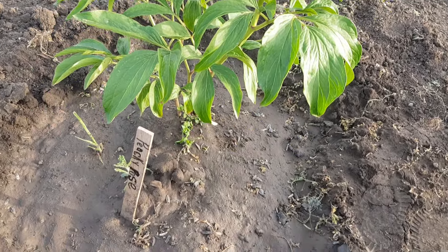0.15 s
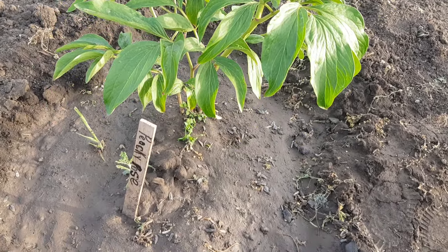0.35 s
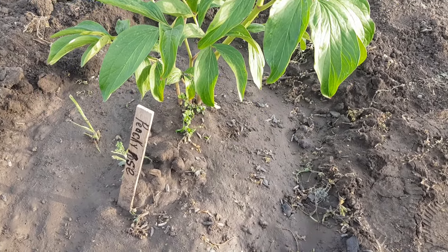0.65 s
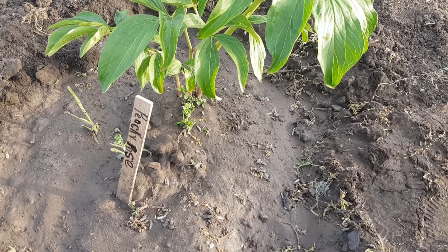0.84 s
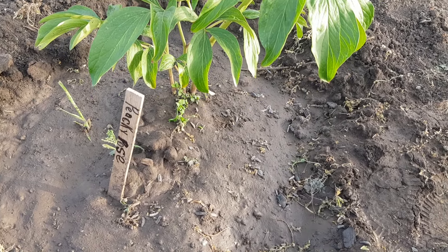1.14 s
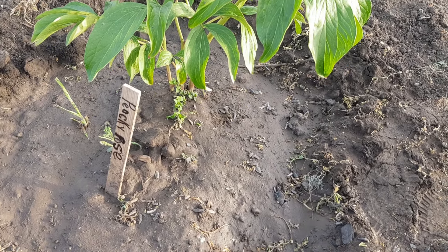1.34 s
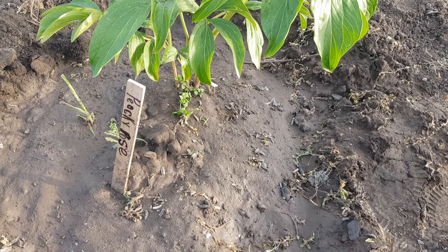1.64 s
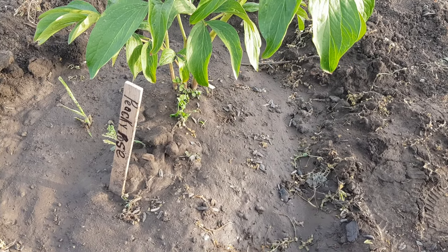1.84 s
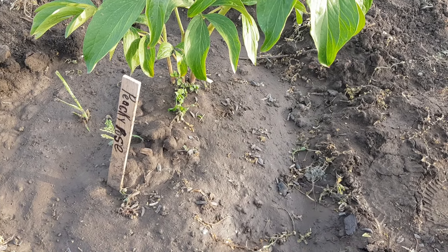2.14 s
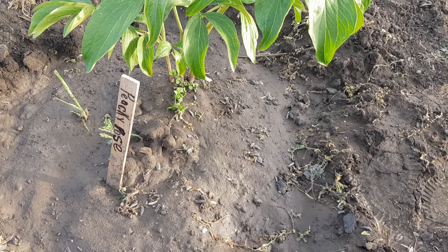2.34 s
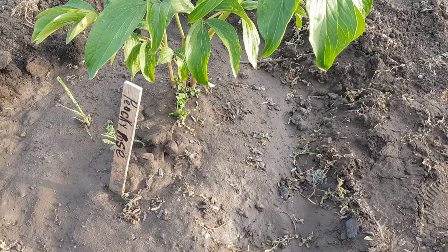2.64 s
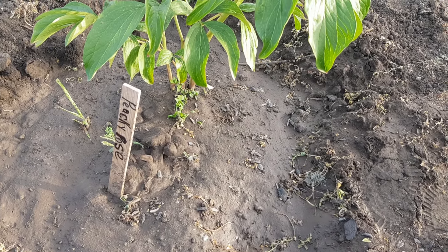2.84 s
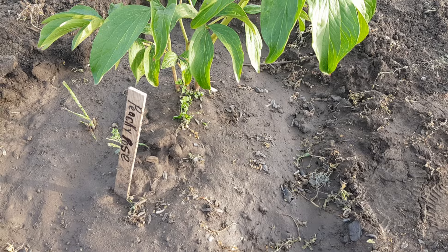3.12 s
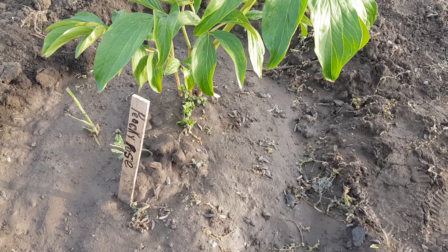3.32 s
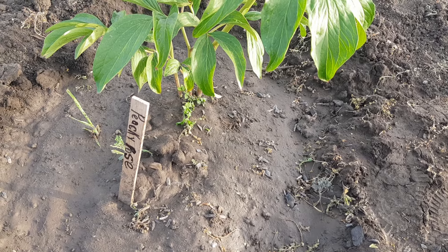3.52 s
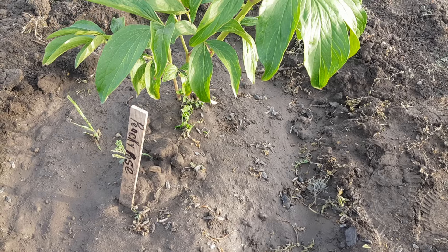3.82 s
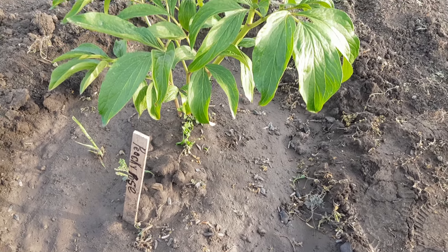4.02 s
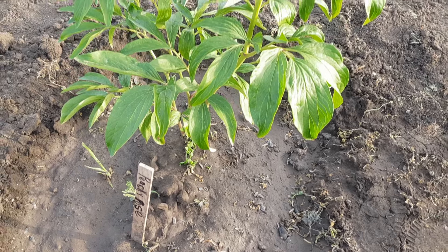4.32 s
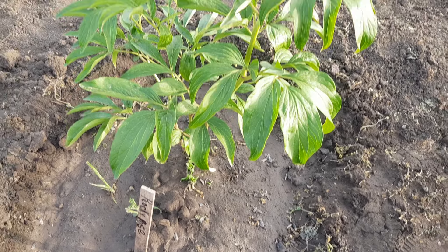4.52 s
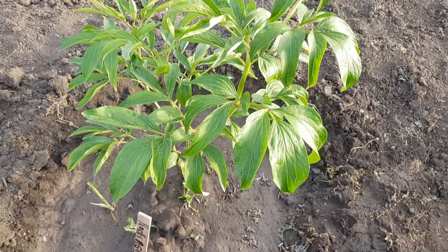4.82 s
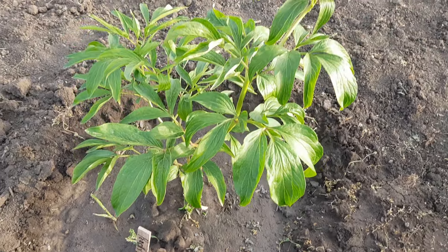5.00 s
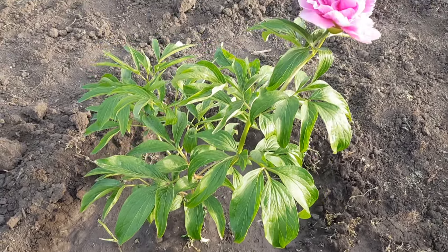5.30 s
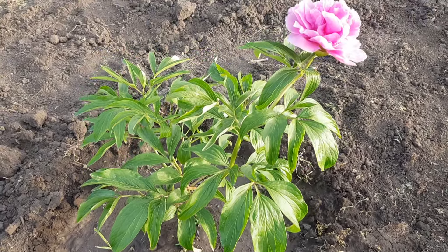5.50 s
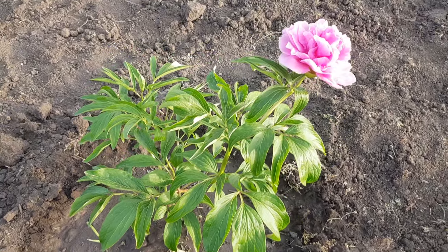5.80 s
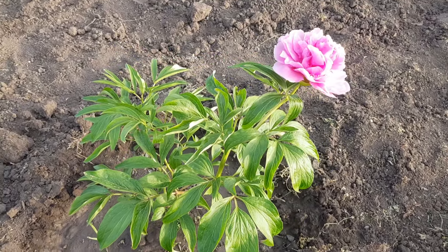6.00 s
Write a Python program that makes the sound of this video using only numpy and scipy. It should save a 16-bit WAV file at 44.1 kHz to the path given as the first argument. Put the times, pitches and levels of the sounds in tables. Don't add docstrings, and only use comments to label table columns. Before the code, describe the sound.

High, clear cricket chirps over a faint insect chorus and distant birds, with deep wind buffeting on the left and late handling thuds.

```python
import sys
import numpy as np
from scipy import signal
from scipy.io import wavfile
from scipy.ndimage import uniform_filter1d

SR = 44100
rng = np.random.default_rng(int(sys.argv[2]) if len(sys.argv) > 2 else 0)


def how_loud(loudness_db):
    steps = np.asarray(loudness_db, float) / 20
    return 10 ** steps


def generate_wav(sig):
    pcm = np.round(np.clip(np.atleast_2d(sig).T, -1, 1) * 32767).astype(np.int16)
    wavfile.write(sys.argv[1], SR, pcm)


N = 271308


def rms_one(x):
    return x / np.sqrt(np.mean(x ** 2, axis=-1, keepdims=True) + 1e-20)


def in_time(rows):
    s, *columns = np.transpose(rows)
    return [np.interp(np.arange(N) / SR, s, c) for c in columns]


def band(x, low_hz, high_hz, order=2):
    return signal.sosfilt(signal.butter(order, [low_hz, high_hz], "band", fs=SR, output="sos"), x)


def drift(rate):
    r = np.exp(-80 * np.pi * rate / SR)
    slow = signal.lfilter([1], [1, -2 * r, r * r], rng.standard_normal(N // 40 + 2002))[2000:]
    return np.interp(np.arange(N) / 40, np.arange(len(slow)), rms_one(slow))


def steadied(x, window_s, share):
    level = np.sqrt(uniform_filter1d(x ** 2, size=int(window_s * SR)) + 1e-3 * np.mean(x ** 2))
    return rms_one(x / level ** share)


def surges(steady_db, s, peak_db, rise_db_s, fall_db_s):
    t = np.arange(0, N / SR, .001)
    since = t - np.asarray(s)[:, None]
    surge_db = np.asarray(peak_db)[:, None] - np.maximum(-rise_db_s * since, fall_db_s * since)
    loudest = np.max(surge_db, axis=0)
    return np.maximum(steady_db, np.interp(np.arange(N) / SR, t, loudest))


def add(out, s, phase, shape, pan_db, lead):
    at = round(s * SR)
    sides = np.array([[.5], [-.5]])
    gains = how_loud(pan_db * sides)
    note = gains / np.sqrt(np.mean(gains ** 2)) * shape * np.sin(phase + lead * sides)
    out[:, at:at + note.shape[1]] += note[:, :max(N - at, 0)]


def coloured(spectrum, alike, patchy_db):
    hz, db = np.transpose(spectrum)
    edges = np.geomspace(200, 17000, num=24)
    out, white = 0, rng.standard_normal((2, 2, N))
    for k, (low, high) in enumerate(zip(edges, edges[1:])):
        mid, side = band(white[k % 2], low, high)
        gain = how_loud(np.interp(np.log(low * high) / 2, np.log(hz), db) + patchy_db * drift(2.9))
        out = out + gain * (np.sqrt(1 + alike) * mid + np.sqrt(1 - alike) * side * [[1], [-1]])
    return rms_one(out)


# (frequency [Hz], level [dB per Hz])
HISS_SPECTRUM = [(2000, -22.5), (6000, -24.5), (8300, -32), (9500, 10), (10500, -8), (12000, 3),
                 (14000, 2.5), (16000, -2)]


def microphone_hiss(level_db):
    return how_loud(level_db + 5.5) * coloured(HISS_SPECTRUM, alike=0, patchy_db=0.9)


# (frequency [Hz], level [dB per Hz])
ROAD_SPECTRUM = [(250, 3.5), (450, -4), (700, -1.5), (1050, 0), (1350, -5), (1800, -8.5), (2600, -11.5),
                 (3600, -13), (5500, -14.5), (8000, -68.5)]


def far_road(level_db):
    wash = coloured(ROAD_SPECTRUM, alike=0.18, patchy_db=3.0)
    return how_loud(level_db + 3.0) * wash * how_loud([[1.5], [-1.5]])


# (time [s], length [s], centre [Hz], level [dB])
VEHICLES = [
    (0.316, 0.26, 850, -73.5),
    (1.392, 0.43, 1046, -76),
    (2.19, 0.63, 986, -69),
]


def passing_vehicles():
    out, t = np.zeros((2, N)), np.arange(N) / SR
    for s, length, hz, db in VEHICLES:
        mid, side = band(rng.standard_normal((2, N)), hz / 0.99, hz * 1.17)
        swell = np.sin(np.pi * np.clip((t - s) / length, 0, 1))
        out += how_loud(db) * swell * rms_one(1.2 * mid + side * [[1], [-1]])
    return out


def strokes(rows):
    stroke_s, fall_hz, stop_share = 0.02426, 322, .11
    out, u = np.zeros((2, N)), np.arange(0, 1, 1 / (stroke_s * SR))
    swell = np.clip(u / 0.39, 0, 1) ** 1.1
    stop = np.clip((1 - u) / stop_share, 0, 1)
    shape = swell * stop * (1 - 0.42 * u)
    for (s, hz, peak_db, pan_db, lead), turn in zip(rows, rng.random(len(rows))):
        phase = 2 * np.pi * (turn + np.cumsum(hz - fall_hz * u ** 1.78) / SR)
        add(out, s, phase, how_loud(peak_db) * shape, pan_db, lead)
    return out


def far_chorus(level_db):
    rows = []
    for place, (b, c, d, e) in zip(np.linspace(-1, 1, num=14), rng.random((14, 4))):
        hz = 4620 + 480 * place * (0.399 + 0.66 * place ** 2)
        pan_db, lead = 5.9 * (e - .4), 8.3 * b
        for start in np.arange(.35 * b - .1, N / SR, .3 + .12 * c):
            for k in range(3):
                peak_db = 6.3 * d + 1.1 * k - 8.3 * place ** 2
                rows.append((abs(start + 0.038 * k), hz, peak_db, pan_db, lead))
    voices = strokes(rows)
    blur = band(band(rng.standard_normal((2, N)), 4280, 4576, order=1), 3700, 5230)
    blur = rms_one(blur * how_loud(2.9 * drift(11)))
    return how_loud(level_db) * (voices / np.sqrt(np.mean(voices ** 2)) + how_loud(-1.5) * blur)


def birds(notes, pan_db, lead, rough_hz, arch_hz):
    out, shake, tremble = np.zeros((2, N)), drift(110), drift(67)
    for s, length, start_hz, end_hz, peak_db in notes:
        u = np.arange(0, 1, 1 / (length * SR))
        here = np.minimum(round(s * SR) + np.arange(len(u)), N - 1)
        bend = start_hz + (end_hz - start_hz) * u + arch_hz * np.sin(np.pi * u)
        phase = 2 * np.pi * np.cumsum(bend + rough_hz * shake[here]) / SR
        shape = np.sin(np.pi * u) ** 0.18 * how_loud(peak_db + 0.08 * rough_hz * tremble[here])
        add(out, s, phase, shape, pan_db, lead)
    return out


# (time [s], length [s], start [Hz], end [Hz], level [dB])
COCKEREL_CALL = [
    (5.36, 0.11, 2190, 2170, -71),
    (5.6, 0.114, 1666, 1663, -66.5),
    (5.6, 0.093, 3280, 3100, -84),
    (5.82, 0.46, 1730, 1740, -69),
    (5.83, 0.58, 2150, 2137, -69.5),
    (5.85, 0.398, 1930, 1903, -76.5),
]


def cockerel():
    return birds(COCKEREL_CALL, pan_db=-3.0, lead=2.64, rough_hz=87.3, arch_hz=-32)


# (time [s], length [s], start [Hz], end [Hz], level [dB])
COOS = [
    (.45, 0.13, 527, 524, -81),
    (1.12, .12, 503, 532, -77),
    (1.45, .33, 503, 500, -76.5),
    (3.05, .16, 509, 513, -70),
    (3.39, .12, 522, 515.3, -70),
]


def dove():
    return birds(COOS, pan_db=11.5, lead=.1, rough_hz=4.0, arch_hz=20.3)


# (time [s], length [s], start [Hz], end [Hz], level [dB])
CHEEPS = [(.52, 0.032, 3600, 2540, -74.5), (1.155, .014, 2660, 3200, -67), (1.168, 0.023, 3110, 2590, -69),
          (1.295, 0.047, 2460, 4400, -71.5), (1.34, 0.049, 4400, 4600, -61.5),
          (1.385, .045, 4500, 3170, -72), (1.975, 0.011, 3910, 3100, -68), (1.985, .03, 3100, 2587, -65),
          (2.27, 0.028, 2880, 2350, -72), (3.04, .034, 2990, 2690, -68), (4.2, 0.2, 3260, 3370, -86)]


def sparrows():
    return birds(CHEEPS, pan_db=-6.5, lead=1.4, rough_hz=30, arch_hz=30)


def scatter(x, t60):
    t = np.arange(round(.4 * SR)) / SR
    tails = rng.standard_normal((2, len(t))) * how_loud(-60 * t / t60) * (t > .004)
    tails /= np.sqrt(np.sum(tails ** 2, axis=1, keepdims=True))
    return signal.fftconvolve(x, tails, axes=1)[:, :N]


# (time [s], flutter level [dB], left minus right [dB])
CASE_RUBS = [(4.992, -50, 4), (5.098, -41, -12), (5.16, -51.5, -6), (5.22, -46, -8.5), (5.3, -44.5, 7),
             (5.323, -42, 4), (5.38, -53, 0), (5.421, -40.5, -1), (5.51, -53, 1), (5.58, -42.5, 12),
             (5.615, -38.5, 2), (5.722, -28.5, -1), (5.808, -30, 0.5), (5.858, -40, 4), (5.949, -50.5, 1),
             (6.028, -51.5, -1), (6.11, -43.5, -5), (6.135, -37.5, 5)]


def finger_rubs():
    s, db, pan_db = np.transpose(CASE_RUBS)
    rub_db = np.array([surges(-110, s, db + side * pan_db, rise_db_s=695, fall_db_s=491)
                       for side in (.5, -.5)])
    judder = rng.standard_normal((2, N)) * how_loud(6.0 * drift(33))
    judder = band(band(judder, 170, 430, order=1), 130, 690)
    thud = np.array([steadied(x, window_s=0.035, share=0.42) for x in judder])
    grain_gain = how_loud(0.65 * (rub_db[1] + 59.5) - 71.5 + 2.4 * drift(90))
    grains = 0.78 * band(rng.standard_normal((2, N)), 700, 2500, order=1)
    grains += band(rng.standard_normal((2, N)), 4200, 5300, order=1)
    grains += 0.23 * band(rng.standard_normal((2, N)), 11000, 20000)
    return band(how_loud(rub_db - 11.0) * thud, 90, 800) + grain_gain * grains * how_loud([[-11], [0]])


# (time [s], peak level [dB], left minus right [dB])
CASE_TICKS = [(0.159, -66.5, 4), (2.2832, -61.5, -4), (2.85, -67, 14), (5.116, -85, -4),
              (5.1452, -52.5, -18.5), (5.19, -56.5, -12), (5.2058, -59.5, -17), (5.2335, -64, -30),
              (5.3017, -60.5, -4.0), (5.7028, -58.5, -19.5), (5.7203, -53, -20), (5.8072, -67, -3),
              (6.1204, -71, -2.5)]


def finger_ticks():
    clicks = np.zeros((2, N))
    for s, peak_db, pan_db in CASE_TICKS:
        clicks[:, round(s * SR)] = how_loud(peak_db + 7.0 + pan_db * np.array([.5, -.5]))
    return band(clicks, 2500, 13000, order=1)


def port(breeze, gusts):
    (breeze_db,), (s, rumble_db, flutter_db) = in_time(breeze), np.transpose(gusts)
    breeze_flutter_db = -86.5 + 0.52 * (breeze_db + 60)
    return np.array([surges(breeze_db, s, rumble_db, rise_db_s=499, fall_db_s=257.5),
                     surges(breeze_flutter_db, s, flutter_db, rise_db_s=901, fall_db_s=603)])


# (time [s], rumble level [dB])
LEFT_BREEZE = [
    (0, -67),
    (.7, -57.5),
    (1.1, -51),
    (2.2, -51.5),
    (2.7, -46),
    (3.1, -35),
    (3.6, -24.5),
]
# (time [s], rumble level [dB])
RIGHT_BREEZE = [(0, -57.5), (.35, -65.5), (.8, -63.5), (2, -57), (3.1, -51.5), (3.7, -57), (4.4, -64),
                (4.7, -68), (5, -58), (5.6, -48), (6.15, -51)]
# (time [s], rumble level [dB], flutter level [dB])
LEFT_GUSTS = [(0, -40, -52), (.13, -37, -62), (0.198, -32, -54), (0.358, -26, -73), (0.398, -32, -62),
              (0.521, -40.5, -75), (0.598, -40.5, -62), (0.842, -41.5, -80), (1.019, -43, -83),
              (1.199, -46, -95), (1.318, -42.5, -73), (1.63, -30.5, -77), (1.7, -36.5, -66),
              (1.778, -35.5, -67), (1.921, -41.5, -75), (2.022, -41.5, -55), (2.178, -38, -69),
              (2.341, -19.5, -60.5), (2.488, -29, -71), (2.611, -30, -60), (2.76, -31, -55),
              (2.808, -27.5, -50), (2.874, -19, -14.5), (2.92, -21.5, -56), (3.028, -29.5, -63),
              (3.218, -17.5, -36.5), (3.296, -13, -37), (3.334, -17.5, -39.5), (3.498, -18, -33.5),
              (3.575, -15.5, -31)]
# (time [s], rumble level [dB], flutter level [dB])
RIGHT_GUSTS = [(2.33, -49, -85), (2.929, -44, -72), (3.248, -43.5, -71), (3.371, -57, -87),
               (3.521, -37.5, -60), (3.601, -34.5, -66.5), (3.848, -49, -55), (4.039, -51, -86),
               (4.211, -53.5, -89), (4.449, -47, -55), (4.829, -48.5, -58.5), (5.039, -39, -44.5),
               (5.09, -43.5, -36.5), (5.23, -50, -68), (5.419, -54, -46), (5.56, -39, -55),
               (5.61, -41.5, -40.5), (5.71, -37.5, -33), (5.8, -45, -32.5), (6.109, -45, -42.5)]


def port_levels():
    left, right = port(LEFT_BREEZE, LEFT_GUSTS), port(RIGHT_BREEZE, RIGHT_GUSTS)
    drop_s, drop_db_s, leak_db, round_off_s = 3.602, 1500.5, -34, 0.012
    lowered = left - drop_db_s * np.clip(np.arange(N) / SR - drop_s, 0, None)
    left = np.maximum(lowered, [right[0] + leak_db, np.full(N, -82.0)])
    return uniform_filter1d(np.array([left, right]), size=int(round_off_s * SR))


def buffeting(rumble_db, flutter_db):
    eddies = rng.standard_normal(N) * how_loud(4.9 * drift(35))
    rumble = steadied(band(band(eddies, 47.7, 81.0, order=1), 15, 117.8), window_s=0.046, share=1.0)
    slap = steadied(band(eddies, 120, 198.4), window_s=0.034, share=1.0)
    flutter = steadied(band(band(eddies, 220, 230, order=1), 93, 540), window_s=0.069, share=0.64)
    slap_db = rumble_db + 0.36 * (rumble_db + 16.5) + 0.29 * (flutter_db - rumble_db) - 2.5
    low = band(how_loud(rumble_db) * rumble, 36, 150) + how_loud(slap_db) * slap
    pressure = low + how_loud(flutter_db - 9.5) * flutter
    limit = 0.89
    return band(limit * np.tanh(pressure / limit), 9.9, 430, order=3)


# (time [s], peak level [dB])
DEEP_TIMES = [
    (2.272, -76),
    (2.76, -73.5),
    (3.146, -70),
    (3.53, -79.5),
    (3.98, -83),
    (4.44, -79.5),
]


def deep_cricket():
    return strokes([(s + .042 * k, 3490, db + 1.5 * (k - 1), 4.0, -.6)
                    for s, db in DEEP_TIMES for k in range(3)])


def chirps(rows, song, lead, lead_spread):
    spread_hz, spread_db = 22.4, 0.5
    chance = rng.standard_normal((len(rows), 3, 3))
    played = []
    for (s, db, pan_db), draws in zip(rows, chance):
        for (late, step_db, hz), (a, b, c) in zip(song, draws):
            peak_db = db + step_db + spread_db * b
            played.append((s + late, hz + spread_hz * a, peak_db, pan_db, lead + lead_spread * c))
    return strokes(played)


# (time [s], peak level [dB], left minus right [dB])
HIGH_TIMES = [
    (.34, -64, 1),
    (.72, -65, 5),
    (1.02, -65, 7),
    (4.48, -67, -2),
    (4.9, -64, -2),
    (5.105, -60, 0),
    (5.375, -58, -8),
    (5.395, -59, 0),
    (5.7, -63, 0),
]
# (time from the middle one [s], level [dB], starting pitch [Hz])
HIGH_STROKES = [
    (-.04, -2, 4880),
    (0, 1, 4900),
    (.04, -2.5, 4900),
]


def high_cricket():
    return chirps(HIGH_TIMES, HIGH_STROKES, lead=1.2, lead_spread=1.8)


# (time [s], peak level [dB], left minus right [dB])
LATE_TIMES = [
    (3.823, -53, 4),
    (4.042, -75, -4),
    (4.116, -51.5, 2),
    (4.394, -48, 3),
    (5.14, -57, -5),
    (5.503, -56, -14),
    (5.773, -51, -1),
    (5.936, -45, -5),
    (6.127, -54, -8),
]
# (time from the middle one [s], level [dB], starting pitch [Hz])
LATE_STROKES = [
    (-.041, -15, 4630),
    (0, -3.5, 4560),
    (0.041, -0.2, 4550),
]


def late_cricket():
    return chirps(LATE_TIMES, LATE_STROKES, lead=-0.98, lead_spread=1.2)


# (time [s], peak level [dB], left minus right [dB])
LEFT_TIMES = [(.245, -49, 3), (.608, -48.5, 6), (.869, -47, 6), (1.161, -49, 15), (1.486, -51, 17),
              (1.89, -48.5, 14), (2.217, -48, 16), (2.529, -47, 17), (2.814, -47.5, 15), (3.05, -49, 14),
              (3.318, -52.5, 18), (3.567, -55.5, 38.5)]
# (time from the middle one [s], level [dB], starting pitch [Hz])
LEFT_STROKES = [
    (-.035, -2, 4450),
    (0, 1.5, 4500),
    (.039, 2, 4510),
]


def left_cricket():
    return chirps(LEFT_TIMES, LEFT_STROKES, lead=-0.37, lead_spread=1.5)


# (time [s], peak level [dB], left minus right [dB])
AHEAD_TIMES = [(.198, -51.5, 4), (.487, -48, 2.5), (.826, -48.5, 3), (1.173, -49, 3), (1.448, -48.5, 7),
               (1.767, -48, 3), (2.104, -49, 3), (2.381, -50, 3), (2.706, -49, 1), (3.024, -48, 6.5),
               (3.336, -52.5, 5), (3.618, -51.5, 1.5), (3.915, -52.5, 1), (4.2, -53, 3.5),
               (4.534, -56, 2.5), (4.745, -55, 0), (4.993, -52, 1), (5.317, -55, -1), (5.646, -51, -3),
               (5.923, -49.5, -1)]
# (time from the middle one [s], level [dB], starting pitch [Hz])
AHEAD_STROKES = [
    (-.0355, -1.5, 4460),
    (0, 1, 4500),
    (.037, 1.26, 4460),
]


def ahead_cricket():
    return chirps(AHEAD_TIMES, AHEAD_STROKES, lead=0.99, lead_spread=0.32)


# (time [s], far chorus level [dB], far road level [dB], microphone hiss level [dB])
GARDEN_LEVELS = [
    (0.0, -69, -76, -79.5),
    (2.84, -67, -72.5, -78),
    (4.11, -73, -79, -81),
    (5.3, -68, -79, -80),
    (6.15, -64, -79.5, -79.5),
]


def scene():
    chorus_db, road_db, hiss_db = in_time(GARDEN_LEVELS)
    beds = microphone_hiss(hiss_db) + far_road(road_db) + passing_vehicles()
    far = far_chorus(chorus_db - 1.5) + cockerel() + dove() + sparrows()
    near = deep_cricket() + high_cricket() + late_cricket() + left_cricket() + ahead_cricket()
    echo = how_loud(-3) * scatter(far, t60=0.24) + how_loud(-16) * scatter(near, t60=0.29)
    left, right = port_levels()
    wind = np.array([buffeting(*left), buffeting(*right)])
    return beds + far + near + echo + wind + finger_rubs() + finger_ticks()


def band_limit(x):
    return signal.sosfilt(signal.butter(12, 15750, fs=SR, output="sos"), x)


def record(dry):
    return band_limit(dry)


dry = scene()
out = record(dry)
generate_wav(out)
```